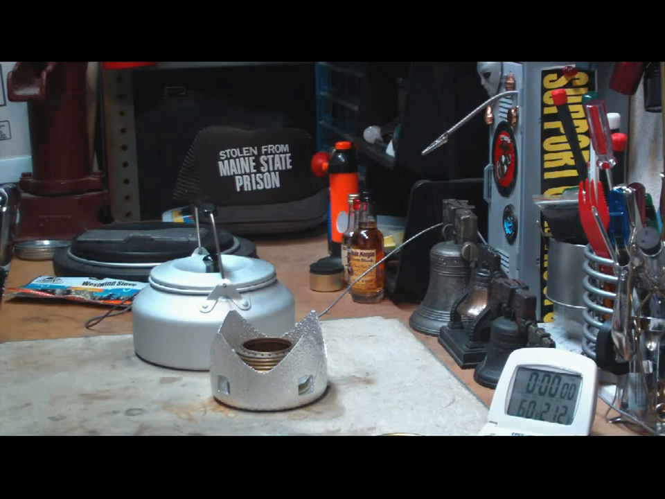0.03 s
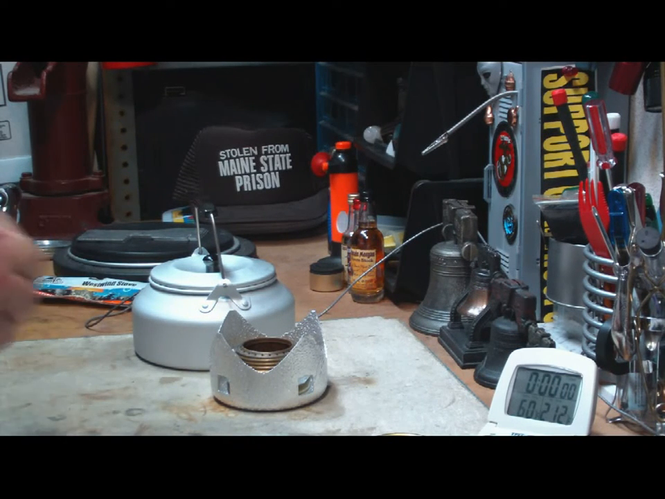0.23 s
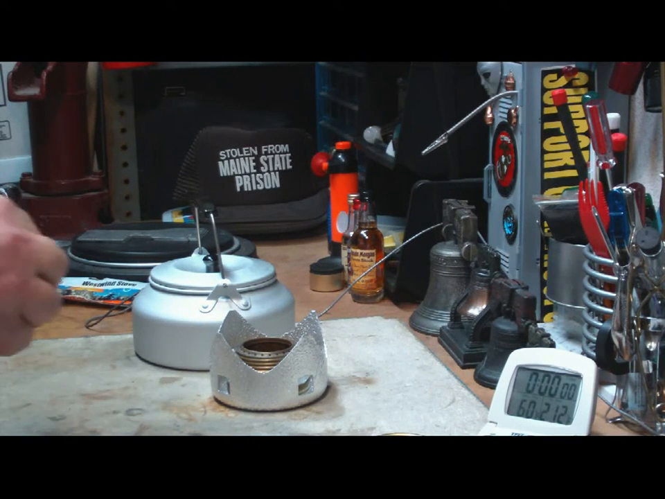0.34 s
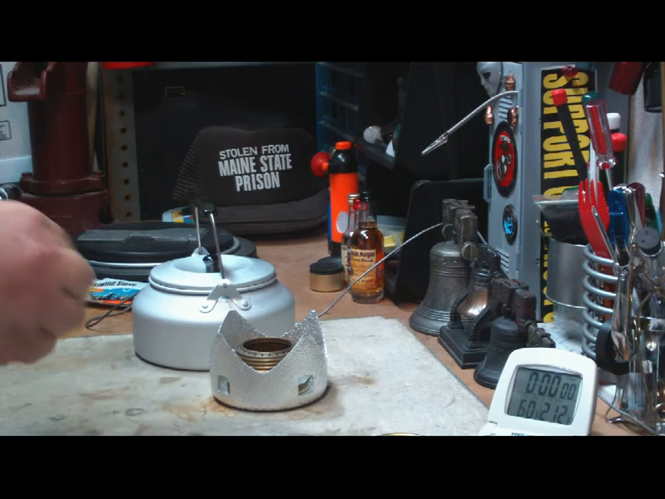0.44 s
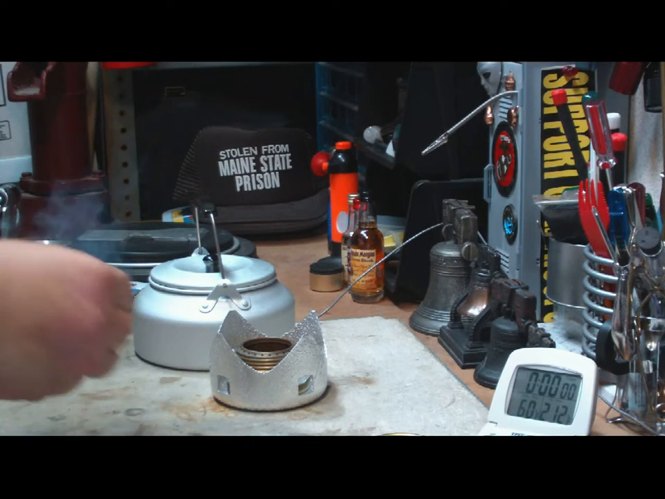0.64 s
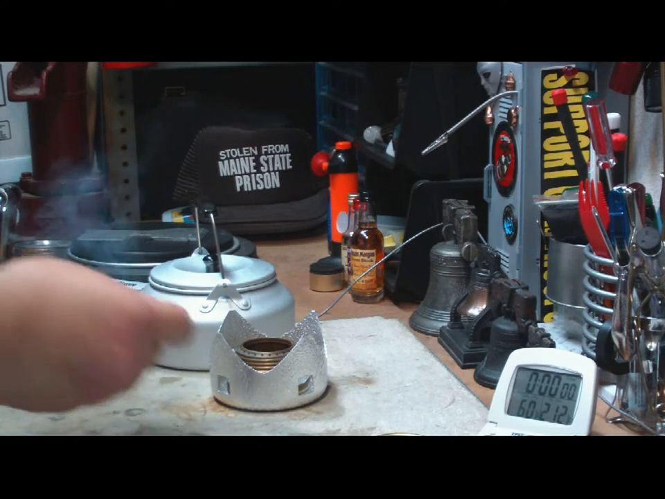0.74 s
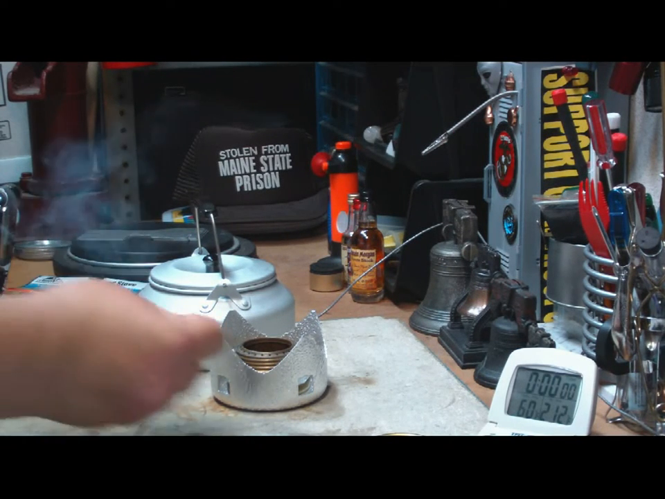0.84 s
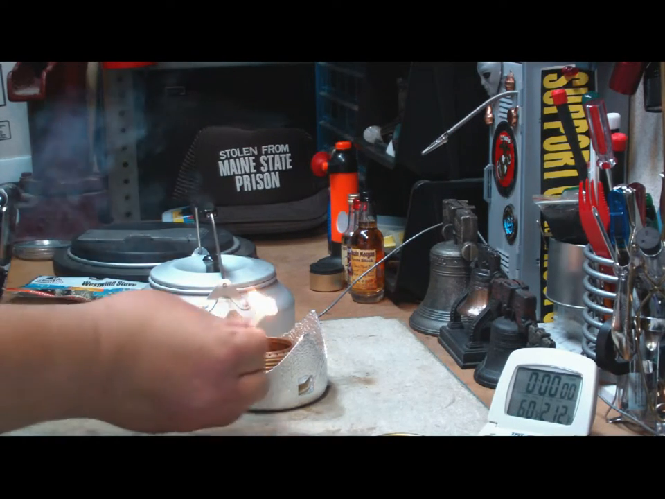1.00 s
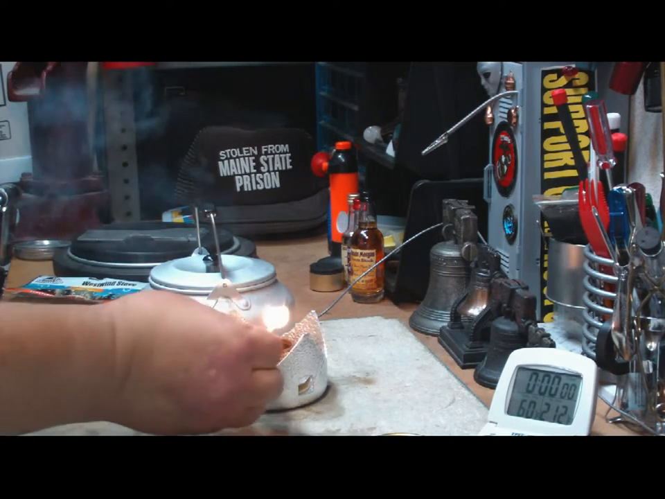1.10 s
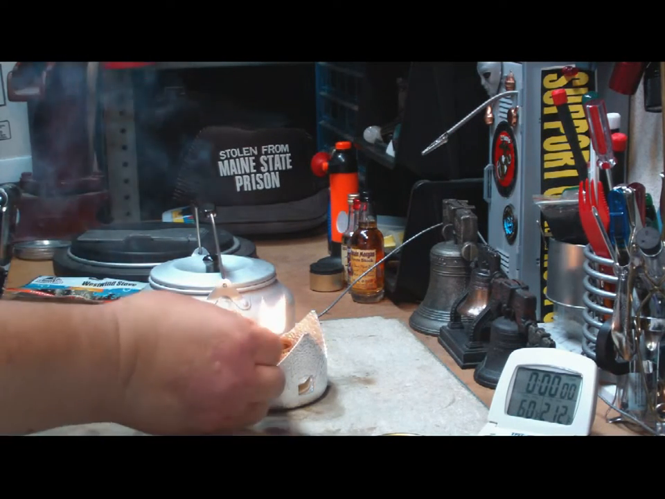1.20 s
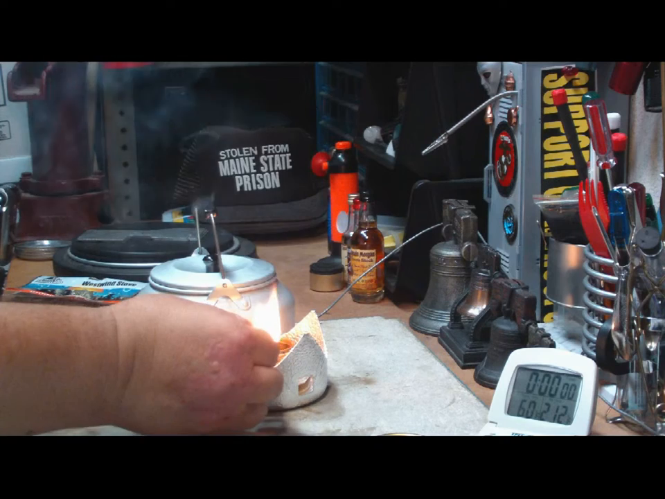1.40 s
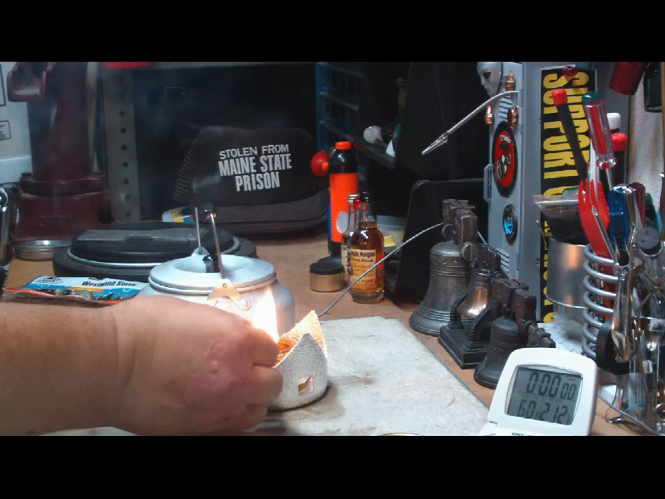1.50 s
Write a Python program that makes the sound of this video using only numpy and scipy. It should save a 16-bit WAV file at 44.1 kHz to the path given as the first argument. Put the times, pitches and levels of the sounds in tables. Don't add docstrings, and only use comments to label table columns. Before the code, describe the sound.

A match is struck once, close up. Low room rumble and soft microphone hiss run throughout. At about 0.21 s the head catches in a burst of tiny knocks and harsh gritty rasp, loudest near 0.22 s and over by 0.27 s, the thin box ringing and the microphone thumping slightly. A small spit follows at 0.3 s; fizz and short echo fade, with barely audible puffs around 0.75 and 1.03 s.

```python
import sys
import numpy as np
from scipy import signal
from scipy.io import wavfile
from scipy.ndimage import uniform_filter1d

SR = 44100
rng = np.random.default_rng(int(sys.argv[2]) if len(sys.argv) > 2 else 0)


def gain_from_db(level_db):
    decades = np.asarray(level_db, float) / 20
    return 10 ** decades


def put_to_file(sound):
    columns = np.atleast_2d(sound).T
    safe = np.clip(columns, -1, 1)
    whole_steps = np.round(safe * 32767)
    wavfile.write(sys.argv[1], SR, whole_steps.astype(np.int16))


N = 68355


def evened(x):
    return x / np.sqrt(np.mean(x ** 2) + 1e-20)


def read(points, hz):
    point_hz, value = np.transpose(points)
    return np.interp(np.log(hz + 1), np.log(point_hz + 1), value)


def ring(modes):
    t = np.arange(SR // 5) / SR
    tones = sum(gain_from_db(db - 60 * t / t60) * np.sin(2 * np.pi * hz * t) for hz, t60, db in modes)
    return tones / np.linalg.norm(tones)


def high(x, hz):
    return signal.sosfilt(signal.butter(2, hz, "high", fs=SR, output="sos"), x)


def catch_knocks():
    knock_start = [.2089, .2142, .2176, .2207, .2233, .2254, .2290, .2314, .2418, .2467, .2655, .3165]
    knock_level = [-29, -28, -17.5, -13.5, -19, -13.5, -18, -18, -22, -26, -30.5, -37]
    knocks = np.zeros(N)
    knocks[np.round(np.array(knock_start) * SR).astype(int)] = gain_from_db(knock_level) * 10
    return knocks


def grit_clicks():
    stroke_time = [
        .2105,
        .2150,
        .2190,
        .2215,
        .2310,
        .2450,
        .2560,
        .2750,
    ]
    stroke_level = [-58, -42, -35.5, -23.5, -27, -32, -53, -66.5]
    grains_per_s, spread_db = 9000, 3.0
    size = gain_from_db(spread_db * rng.exponential(1, N)) * rng.choice([-1., 1.], N)
    hits = rng.random(N) < grains_per_s / SR
    pressure_db = np.interp(np.arange(N) / SR, stroke_time, stroke_level, -120, -120)
    return evened(size * hits) * gain_from_db(pressure_db)


def box_ring(knocks, grit):
    box_pitch = [468, 600, 690, 861, 950, 1030, 1290, 1360, 1455, 1600, 2060]
    box_decay = [.06, .04, .05, .05, .05, .035, .035, .05, .04, .03, .07]
    box_level = [-16, -17.5, -6.5, -6.5, 4, -0.5, 1, 6, -1.5, -7, -3]
    contact_s, grit_db, low_hz = 0.00052, -9, 500
    touch = np.hanning(round(contact_s * SR) + 2)
    push = np.convolve(knocks + gain_from_db(grit_db) * grit, touch / touch.sum())
    box = signal.oaconvolve(push, ring(zip(box_pitch, box_decay, box_level)))[:N]
    return high(high(box, low_hz), low_hz)


def scrape(grit):
    # pitch_hz, t60_s, level_db
    shell = [(2920, 0.062, -8), (3300, 0.018, 1), (3800, 0.012, 3), (4145, 0.024, 0.5), (4640, 0.034, -5),
             (5300, 0.0067, 5.5), (6140, 0.013, -5)]
    low_hz, top_hz, raw_db = 2700, 4800, 8.5
    rasp = signal.lfilter(*signal.butter(1, top_hz, fs=SR), high(grit, low_hz))
    return signal.oaconvolve(grit, ring(shell))[:N] + gain_from_db(raw_db) * rasp


def strike():
    grit = grit_clicks()
    return box_ring(catch_knocks(), grit) + scrape(grit)


def swell_and_fade(t, start_s, length_s):
    u = np.maximum(t - start_s, 0) / length_s
    return u * np.exp(1 - u)


def flare():
    # start_s, rise_s
    sputter_time = [
        (.305, .003),
        (.314, .003),
        (.75, .02),
        (.93, .03),
        (1.03, .02),
    ]
    sputter_level = [-40.5, -50, -59.5, -75, -55.5]
    fizz_start_s, fizz_db, fizz_t60_s, low_hz = .245, -39, 0.8, 2300
    t = np.arange(N) / SR
    level = gain_from_db(fizz_db - 60 * abs(t - fizz_start_s) / fizz_t60_s) * (t > fizz_start_s)
    for (start_s, rise_s), db in zip(sputter_time, sputter_level):
        level = level + gain_from_db(db) * swell_and_fade(t, start_s, rise_s)
    return level * high(rng.standard_normal(N), low_hz)


def room(x):
    # pitch_hz, t60_s
    echo_decay = [(300, .2), (900, 0.45), (2500, .33), (6000, 0.41)]
    gap_s, spacing = 0.0091, 10
    taps = np.zeros(SR)
    at = np.arange(0, SR - spacing, spacing)
    taps[at + rng.integers(0, spacing, len(at))] = rng.choice([-1., 1.], len(at))
    taps *= np.arange(SR) > gap_s * SR
    hz, t, spectra = signal.stft(taps, SR, nperseg=256)
    fade = gain_from_db(-60 * t / read(echo_decay, hz)[:, None])
    tail = signal.istft(spectra * fade, SR, nperseg=256)[1]
    return signal.fftconvolve(x, tail / np.linalg.norm(tail))[:N]


def air():
    # pitch_hz, level_db (per Hz)
    noise_colour = [(12, -29.5), (20, 3.5), (165, -4), (282, -7.5), (319, -9.5), (408, -11), (439, -11),
                    (7000, -24.5), (9100, -61), (15400, -120)]
    level_db, patch_db, swell_db = -51, 1.0, .3
    frames, hz = N // 512 + 5, np.fft.rfftfreq(2048, 1 / SR)
    a, b, patches = rng.standard_normal((frames, 1025, 3)).T
    patches = uniform_filter1d(patches, size=20, axis=0)
    patches = evened(uniform_filter1d(patches, size=6, axis=1))
    swell = evened(uniform_filter1d(rng.standard_normal(frames), size=8))
    colour_db = read(noise_colour, hz)[:, None] + patch_db * patches + swell_db * swell
    noise = signal.istft((a + 1j * b) * gain_from_db(colour_db), nperseg=2048, noverlap=1536)[1]
    return gain_from_db(level_db) * evened(noise[512:N + 512])


def scene():
    near = strike() + flare()
    echo_db = -12.5
    return (near + gain_from_db(echo_db) * room(near) + air())[None]


def preamp_bias():
    kick_s, kick_db, kick_rise_s = .2195, -24, 0.00087
    sag_s, sag_db, sag_rise_s, sag_recover_s = .2255, -30.5, 0.001, .045
    t = np.arange(N) / SR
    kick = gain_from_db(kick_db) * swell_and_fade(t, kick_s, kick_rise_s)
    late = np.maximum(t - sag_s, 0)
    sag = gain_from_db(sag_db) * (1 - np.exp(-late / sag_rise_s)) * np.exp(-late / sag_recover_s)
    return kick - sag


def low_pass(x, hz):
    return signal.oaconvolve(x, signal.firwin(301, hz, window=("kaiser", 9), fs=SR)[None], "same")


def band_limit(x, dry):
    edge_hz, leak_hz, leak_db, gate_db = 7090, 7900, -16.5, -31
    kept, wide = low_pass(x, edge_hz), low_pass(x, leak_hz)
    power = abs(uniform_filter1d(dry ** 2, size=900, axis=1))
    gate = power ** 2 / (power ** 2 + gain_from_db(gate_db) ** 4)
    return kept + gain_from_db(leak_db) * gate * (wide - kept)


def top_cut(x):
    return signal.sosfilt(signal.butter(12, 8090, fs=SR, output="sos"), x)


def record(dry):
    mix = band_limit(dry + preamp_bias(), dry)
    return top_cut(mix)


dry = scene()
out = record(dry)
put_to_file(out)
```